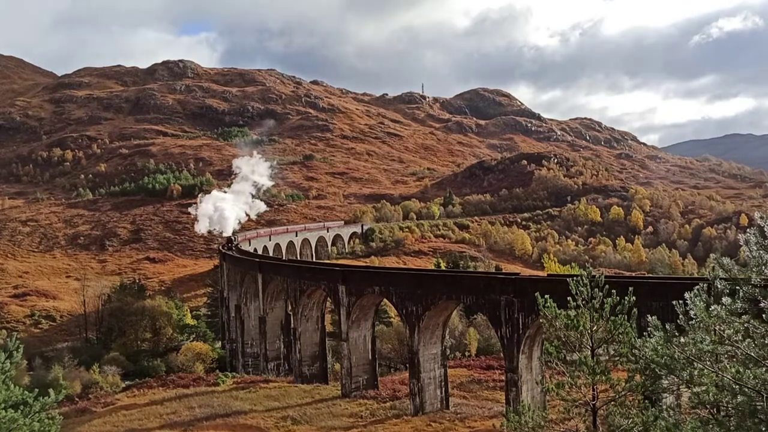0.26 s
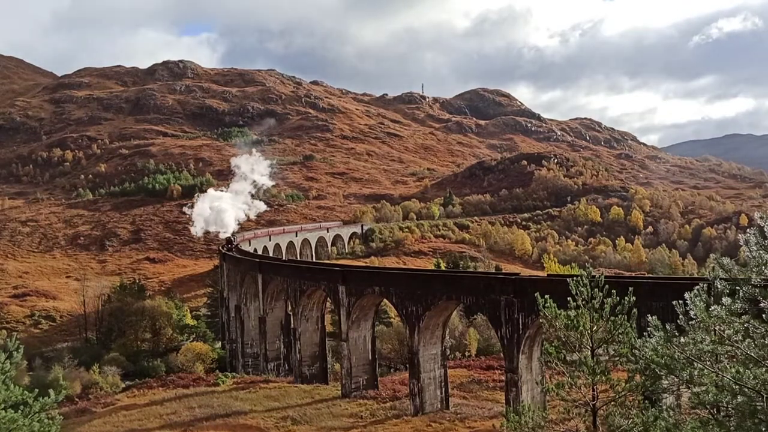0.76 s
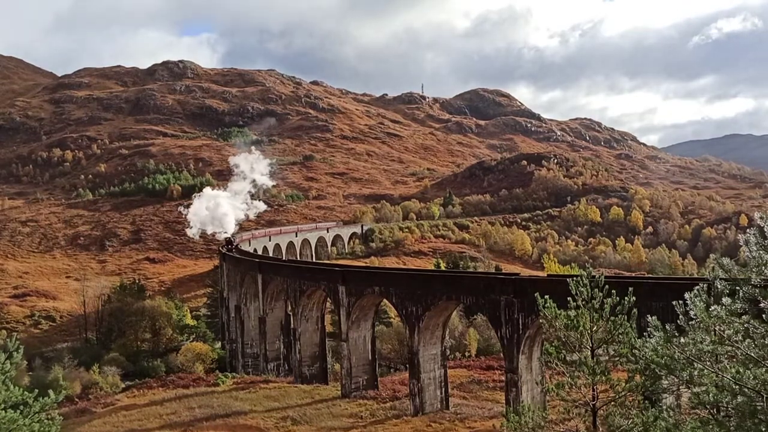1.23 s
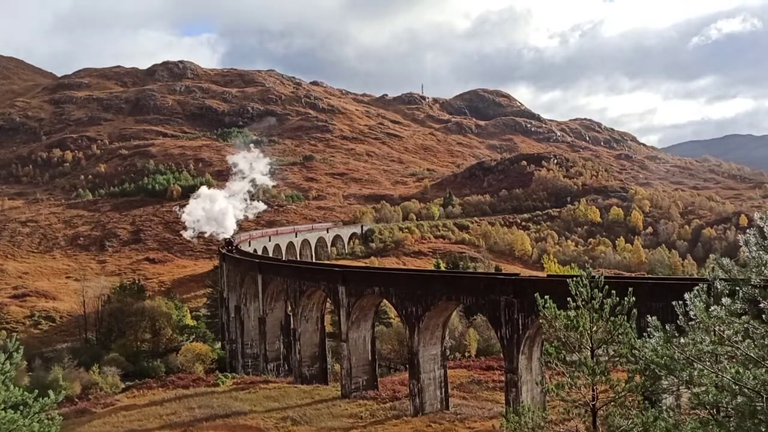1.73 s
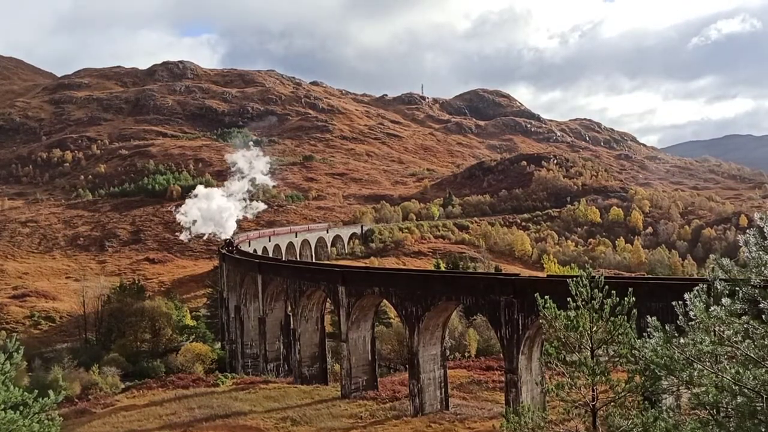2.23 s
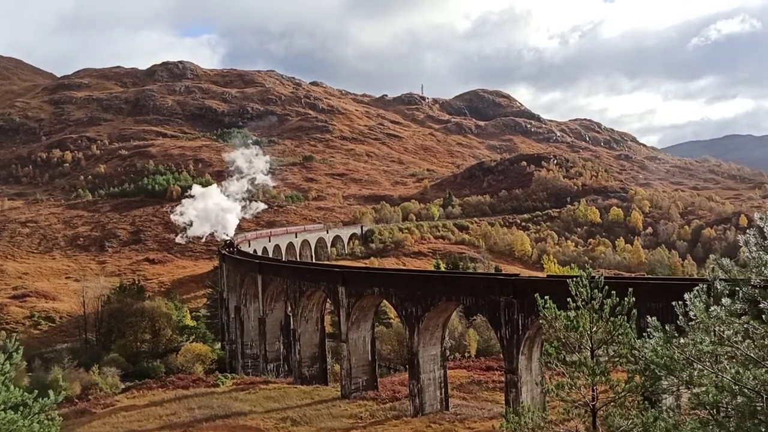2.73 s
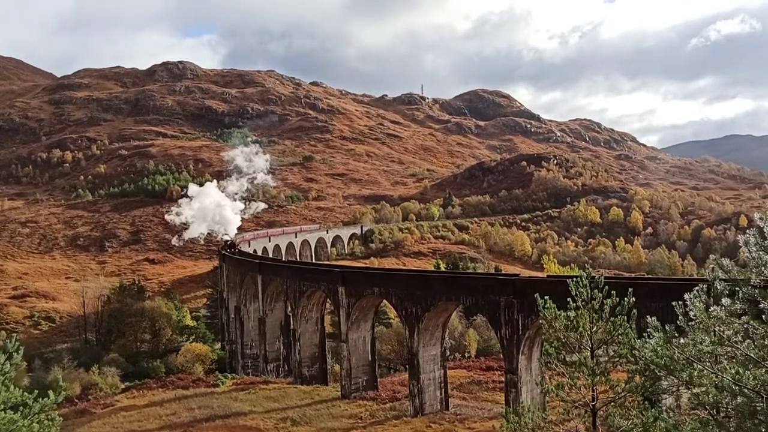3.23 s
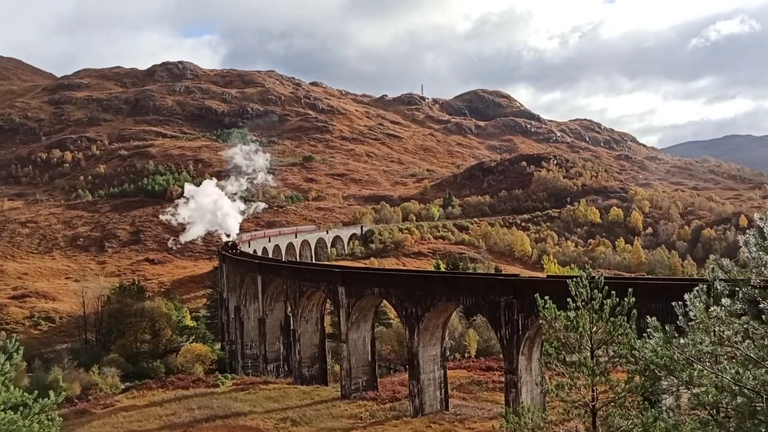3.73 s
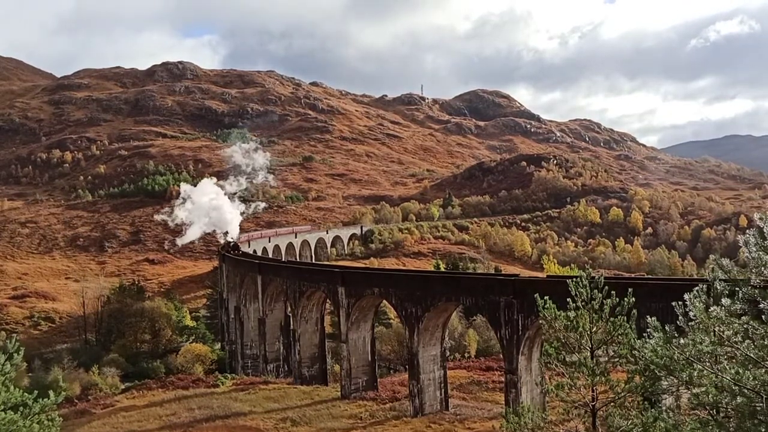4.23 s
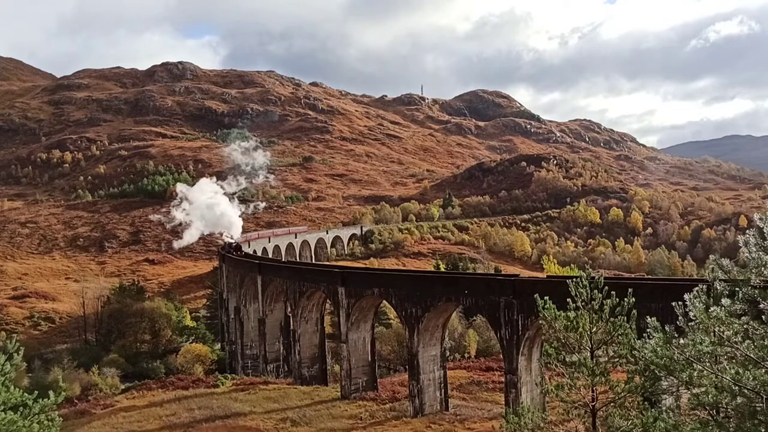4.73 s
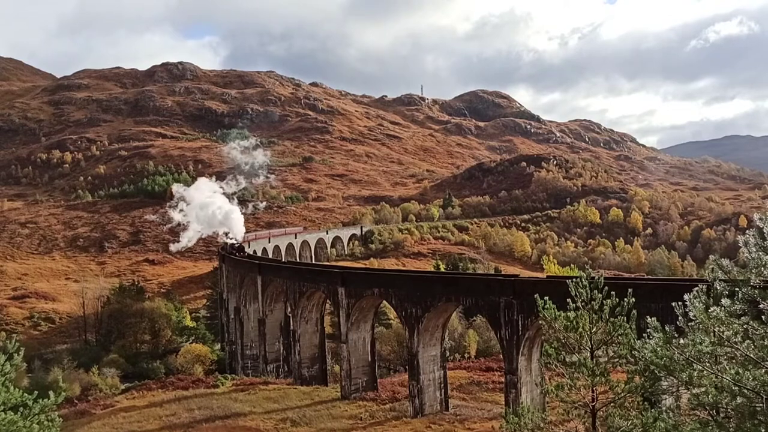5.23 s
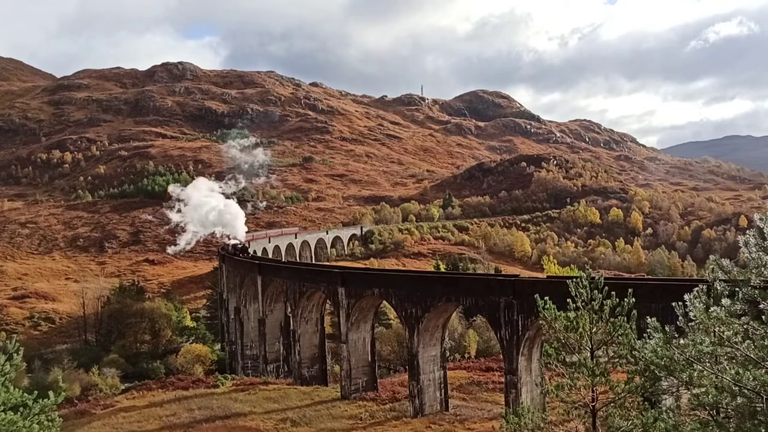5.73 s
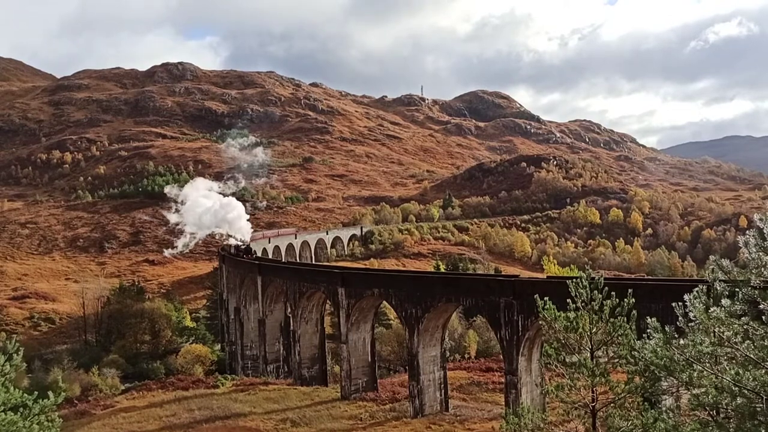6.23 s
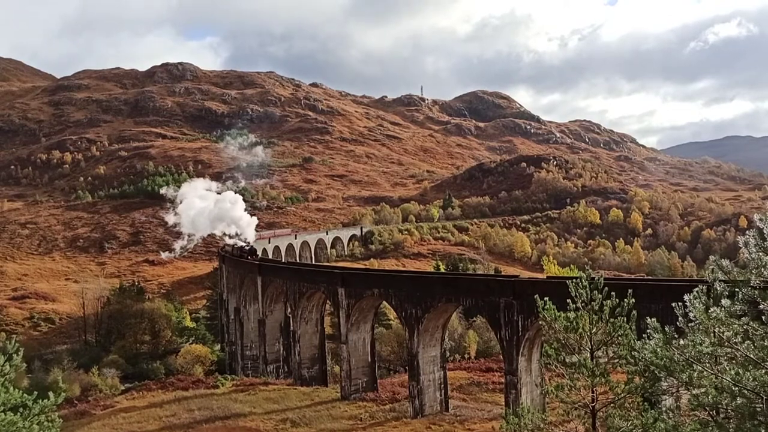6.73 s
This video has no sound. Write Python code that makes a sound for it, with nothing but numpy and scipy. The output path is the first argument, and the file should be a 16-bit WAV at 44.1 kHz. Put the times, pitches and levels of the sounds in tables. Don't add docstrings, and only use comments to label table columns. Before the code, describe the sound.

Outdoors in a wide valley, a steam locomotive crosses a viaduct at some distance, captured in stereo on a handheld phone. From 0 to 7 seconds it chuffs continuously, close to six beats per second and very slightly quickening, with small differences between the four beats of each wheel turn. Each beat is a soft low thump and hollow boom, then a breathy roar and airy hiss, blurred by short echoes and hillside reverberation. At first it is duller, the right side muffled by a hand. At about 1.87 seconds a close dull knock and swelling cloth rub stop abruptly at 2.02; a fainter crackling stroke follows at 2.09 to 2.18, ending in two tiny snaps. The right side then opens up. Chuffs are stronger around 2.4 to 4 seconds, treble wavering, then crisp and hissy after 6. Leaking steam and faint leaves and water rise gently. It ends still chuffing.

```python
import sys
import numpy as np
from scipy import signal
from scipy.fft import rfft, irfft, next_fast_len
from scipy.io import wavfile
from scipy.ndimage import uniform_filter1d, map_coordinates

SR = 44100
rng = np.random.default_rng(int(sys.argv[2]) if len(sys.argv) > 2 else 0)


def natural_amplitude(level_db):
    exponent = np.asarray(level_db, float) / 20
    return 10 ** exponent


def output_pcm(signal):
    pcm = np.clip(np.atleast_2d(signal).T, -1, 1) * 32767
    wavfile.write(sys.argv[1], SR, np.round(pcm).astype(np.int16))


N = 306936

# place_in_turn (0-1), blast_db, thump_db
CYLINDER_ENDS = [
    (0, -0.5, -0.4),
    (0.245, -1.04, 0.35),
    (0.5107, 0.06, 1.3),
    (0.767, 0.03, 1),
]
# time_s, level_db
BLAST_FORCE = [(0, -11), (.17, -16), (.4, -10.5), (.7, -12), (1.2, -10), (1.75, -9), (2.2, -8), (2.4, -5.5),
               (2.7, -9), (3.05, -6.5), (3.5, -8), (3.8, -6), (4.6, -7.5), (5.3, -8), (5.6, -8), (6.05, -9),
               (6.96, -9)]
# time_s, level_db
AIR_CLARITY = [(0, -30), (.2, -22.5), (.7, -28), (1.2, -27), (1.6, -21.5), (2.05, -18), (2.4, -22.5),
               (3.04, -16.5), (3.35, -18), (3.7, -26.5), (4.2, -26), (4.65, -16.5), (5, -25.5),
               (5.3, -20.5), (5.75, -27.5), (6.05, -20.5), (6.3, -13.5), (6.96, -16.5)]
# time_s, level_db
SHEEN = [(0, 0), (1, -7), (2, -9), (3, -5), (4, -2.5), (4.65, 4), (5, -1.5), (6, 0.5), (6.96, 1)]
# pitch_hz, density_db_per_hz
SMOKEBOX = [(40, -40), (86, -10.5), (105, -12.5), (130, -14), (170, 0), (194, 4), (230, 2), (271, -17),
            (340, -35)]
# pitch_hz, density_db_per_hz
CHIMNEY = [(200, -28), (271, -9.5), (353, 1.5), (430, 0), (506, -1), (590, -12), (625, -9), (668, -12),
           (800, -7), (893, -3), (1000, -8.5), (1100, -25.5), (1430, -39.5)]
# pitch_hz, density_db_per_hz
ROAR = [(600, -30.5), (1000, -17), (1160, -5), (1260, -10), (1400, -1.5), (1600, -10), (2100, -14.5),
        (3000, -27.5)]
# pitch_hz, density_db_per_hz
RIM_HISS = [(1200, -23), (2100, -8.5), (2500, 2), (2650, 2), (3250, 2.5), (3500, 0), (4300, 0), (4900, -6),
            (6000, -32)]
# pitch_hz, density_db_per_hz
FIZZ = [(3500, -22), (4800, 1.5), (6400, 4.5), (8000, -0.5), (12000, -13.5)]
# pitch_hz, density_db_per_hz
CYLINDER_LEAK = [(1500, -25.5), (2500, -7), (3800, -4.5), (4300, 3), (4700, -5), (6500, -3), (8000, -3.5)]
# start_delay_ms, end_delay_ms, left_db, right_db
BOUNCES = [
    (1.9, 1.324, -29, -21.5),
    (3.1, 4.2, -31, -39),
    (5.7, 4.91, -17, -20),
    (8.3, 9.8, -22.5, -24),
    (13.1, 11.2, -15.5, -20.5),
]
# pitch_hz, t60_s
BUSH_DECAY = [(100, 0.027), (1000, 0.059), (8000, 0.029)]
# pitch_hz, level_db
BUSH_COLOUR = [(250, -27), (500, -16), (1100, -9), (2200, -7), (4500, -8), (8000, -3)]
# pitch_hz, t60_s
HILL_DECAY = [(100, 0.4), (300, 1.2), (1000, 0.66), (4000, 0.14), (8000, 1.1)]
# pitch_hz, level_db
HAND_SHADE = [(500, -.5), (1500, -2), (2600, -5), (4500, -8), (5200, -15), (7700, -22)]
# start_s, stop_s, rub_db, crackle_db, swell_db
SLEEVE = [
    (1.872, 2.023, -25, -58, 26),
    (2.09, 2.177, -38, -39, 36),
]
# pitch_hz, density_db_per_hz
RUB = [(120, -23), (300, -6.5), (1000, 0.5), (2000, -9), (3400, -14.5), (4500, -18.5), (8000, -28)]
# time_s, pitch_hz, level_db
KNOCK = (1.8745, 150, 0)
# time_s, level_db
SNAPS = [
    (2.172, -34),
    (2.180, -31),
]
# pitch_hz, density_db_per_hz
HILLSIDE_AIR = [(25, -18.5), (60, -10), (120, 0), (400, -6), (1000, -8.5), (2000, -15.5), (4200, -19.5),
                (8000, -19.5), (12000, -34.5)]
# pitch_hz, likeness (0-1)
AIR_LIKENESS = [(60, 1), (250, 0.91), (1000, 0.16), (4000, 0.15)]
# pitch_hz, level_db
TONE_STEPS = [(4650, 1.5), (4850, -4.5), (6000, -7), (6150, 0), (7600, -3), (7750, -10.5), (8350, -20),
              (8600, -68), (11400, -73.5)]
# pitch_hz, level_db
PORT_TILT = [(600, 0), (1500, -1), (2600, 1.5), (4500, 1.5), (8000, 3)]

TURNS = 11


def evened(x):
    return x / np.sqrt(np.mean(x ** 2) + 1e-20)


def read(points, hz):
    f, value = np.transpose(points)
    return np.interp(np.log(hz + 1), np.log(f + 1), value)


def coloured(x, points):
    log_gain = np.log(natural_amplitude(read(points, abs(np.fft.fftfreq(8192, 1 / SR)))))
    taps = np.fft.ifft(np.exp(np.conj(signal.hilbert(log_gain)))).real[:4096]
    return signal.oaconvolve(x, taps / np.linalg.norm(taps))[:len(x)]


def filtered(x, db):
    size = next_fast_len(N)
    gain = natural_amplitude(db(np.fft.rfftfreq(size, 1 / SR)))
    return irfft(rfft(x, size) * gain, size)[..., :N]


def band(x, lo_hz, hi_hz):
    return signal.sosfilt(signal.butter(8, [lo_hz, hi_hz], "band", fs=SR, output="sos"), x)


def delayed(x, samples):
    return map_coordinates(x, [np.arange(N) - samples], order=3)


def nearing(gain_db, bend):
    return natural_amplitude(gain_db * (np.arange(N) / N) ** bend)


def beat_times():
    first_s, turn_s, quicken_s = .0107, .68882, .00389
    turns = (np.arange(TURNS)[:, None] + np.transpose(CYLINDER_ENDS)[0]).ravel()
    return first_s + turn_s * turns - quicken_s * turns ** 2


def blasts(db, late_s, rise_s, open_share, t60_s, flutter_db, size):
    valve_s = 0.057
    t, flow = np.arange(N) / SR, np.zeros(N)
    for s, gain in zip(beat_times(), natural_amplitude(db)):
        u = np.maximum(t - s - late_s, 0)
        opening = 1 - np.exp(-(u / rise_s) ** 2)
        dying = natural_amplitude(-60 * np.maximum(u - open_share * valve_s, 0) / t60_s)
        flow += gain * opening * dying
    eddies = evened(uniform_filter1d(rng.standard_normal(N), size))
    return flow * natural_amplitude(flutter_db * eddies) * rng.standard_normal(N)


def locomotive():
    s = beat_times()
    way = s * SR / N
    end_db, end_thump_db = np.tile(CYLINDER_ENDS, (TURNS, 1)).T[1:]
    chance_db = 1.1 * rng.standard_normal((len(s), 4)).T

    blast_db = np.interp(s, *np.transpose(BLAST_FORCE)) + end_db
    clarity_db = np.interp(s, *np.transpose(AIR_CLARITY))
    thump_db = -19 + 0.34 * blast_db + 3.5 * way + end_thump_db + chance_db[0]
    roar_db = 0.76 * blast_db - 25.5 + 11.5 * way ** 0.28 + .5 * chance_db[1]
    hiss_db = blast_db + clarity_db + .5 * chance_db[2]
    fizz_db = blast_db + 0.63 * clarity_db + np.interp(s, *np.transpose(SHEEN)) + chance_db[3]

    thump = blasts(thump_db, -0.014, 0.0093, 0.88, 0.31, flutter_db=0.97, size=400)
    boom = blasts(blast_db, -0.014, 0.02, 0.96, 0.19, flutter_db=1.14, size=300)
    roar = blasts(roar_db, -0.011, 0.019, 0.99, 0.17, flutter_db=2.2, size=200)
    hiss = blasts(hiss_db, -0.0011, 0.011, 0.79, 0.18, flutter_db=1.9, size=120)
    fizz = blasts(fizz_db, -0.0076, 0.024, 1.0, 0.067, flutter_db=1.7, size=120)

    low = natural_amplitude(-3.0) * coloured(thump, SMOKEBOX) + natural_amplitude(-8.5) * coloured(boom, CHIMNEY)
    high = natural_amplitude(-2.0) * coloured(hiss, RIM_HISS) + natural_amplitude(-9.5) * coloured(fizz, FIZZ)
    return low + natural_amplitude(-4.0) * coloured(roar, ROAR) + high


def leak():
    waver = natural_amplitude(2.6 * evened(uniform_filter1d(rng.standard_normal(N), 3000)))
    return natural_amplitude(-58) * nearing(23.5, 1.4) * waver * coloured(rng.standard_normal(N), CYLINDER_LEAK)


def bounces(x):
    way = np.arange(N) / N
    echoes = np.zeros((2, N))
    for start_ms, end_ms, left_db, right_db in BOUNCES:
        delay_ms = start_ms + (end_ms - start_ms) * way
        echoes += natural_amplitude([[left_db], [right_db]]) * delayed(x, delay_ms * SR / 1000)
    return echoes


def scattered(x, decays, gap):
    taps = np.zeros((2, SR))
    taps[:, gap::20] = rng.choice([-1., 1.], taps[:, gap::20].shape)
    places = np.argsort(np.arange(SR) // 20 + rng.random((2, SR)), 1)
    taps = np.take_along_axis(taps, places, 1)
    hz, t, z = signal.stft(taps, SR, nperseg=128)
    tail = signal.istft(z * natural_amplitude(-60 * t / read(decays, hz)[:, None]), SR, nperseg=128)[1]
    return signal.fftconvolve(x[None], tail / np.linalg.norm(tail[0]), axes=1)[:, :N]


def bushes(x):
    leafy = natural_amplitude(3.5 * hand()) * filtered(x, lambda hz: read(BUSH_COLOUR, hz))
    turn = 2 * np.pi * .83 * np.arange(N) / SR
    echoes = np.zeros((2, N))
    for k in range(3):
        share = np.sqrt(2 / 3) * np.cos(turn + k * np.pi / 3)
        echoes += scattered(leafy * share, BUSH_DECAY, gap=40)
    return echoes


def hillsides(x):
    slopes = natural_amplitude(-17) * scattered(x, HILL_DECAY, gap=400)
    slopes[1] = .85 * slopes[0] + .5 * slopes[1]
    return slopes


def hand():
    t, bared = np.arange(N) / SR, np.zeros(N)
    for start_s, stop_s, *_ in SLEEVE:
        bared += .5 * np.clip((t - start_s) / (stop_s - start_s), 0, 1) ** 2
    return 1 - bared


def strokes(column, bend):
    t, gain = np.arange(N) / SR, np.zeros(N)
    for stroke in SLEEVE:
        start_s, stop_s, swell_db = stroke[0], stroke[1], stroke[4]
        to_go = np.clip((stop_s - t) / (stop_s - start_s), 0, 1)
        stop_db = 4500 * np.clip(t - stop_s, 0, .1)
        gain += (t > start_s) * natural_amplitude(stroke[column] - swell_db * to_go ** bend - stop_db)
    return gain


def sleeve():
    t = np.arange(N) / SR
    lumps = natural_amplitude(1.5 * evened(uniform_filter1d(rng.standard_normal(N), 400)))
    push = evened(band(rng.standard_normal((2, N)) * lumps, 80, 400))
    rub = np.array([coloured(v, RUB) for v in rng.standard_normal((2, N))])
    knock_s, knock_hz, knock_db = KNOCK
    u = np.maximum(t - knock_s, 0)
    jolt = natural_amplitude(-18.5 - 55 * u) * np.minimum(u / .03, 1) * (t < SLEEVE[0][1])
    near = strokes(column=2, bend=2.7) * (natural_amplitude(-5) * push + rub) + jolt * push
    near += natural_amplitude(knock_db - 3200 * u) * (1 - np.exp(-u / .003)) * np.sin(2 * np.pi * knock_hz * u)
    for s, db in SNAPS:
        near += natural_amplitude(db - 25000 * abs(t - s)) * rng.standard_normal(N)
    return near * natural_amplitude([[-13], [5]])


def air():
    frames, hz = N // 256 + 5, np.fft.rfftfreq(1024, 1 / SR)
    a, b, c, d, patches = rng.standard_normal((frames, 513, 5)).T
    patches = evened(uniform_filter1d(uniform_filter1d(patches, 12, 0), 14, 1))
    same = np.clip(read(AIR_LIKENESS, hz), -1, 1)[:, None]
    left = a + 1j * b
    right = same * left + np.sqrt(1 - same ** 2) * (c + 1j * d)
    z = np.array([left, right]) * natural_amplitude(read(HILLSIDE_AIR, hz)[:, None] + 2.0 * patches)
    bed = evened(signal.istft(z, nperseg=1024, noverlap=768)[1][:, :N])
    return natural_amplitude(-41) * nearing(6.5, 2.14) * bed


def top_band(heard):
    fibres = .5 + uniform_filter1d(30. * (rng.random(N) < 200 / SR), 40)
    crackle = strokes(column=3, bend=1.0) * evened(rng.standard_normal((2, N)) * fibres)
    treble = np.sqrt(abs(uniform_filter1d(band(heard[0], 6200, 7600) ** 2, 400)))
    steam = natural_amplitude(-46) * nearing(14, bend=3) * treble
    hiss = np.hypot(natural_amplitude(-70.5), steam) * rng.standard_normal((2, N))
    return band(band(crackle + hiss, 9900, 15700), 11500, 16000) * natural_amplitude([[-2.5], [2.5]])


def scene():
    t = np.arange(N) / SR
    train = locomotive() + leak()
    direct = train + bounces(train)
    swing = np.clip((3.8 - t) / 1.6, 0, 1)
    lag_samples = 4 + 1.9 * hand() + 1.5 * swing
    direct[1] = delayed(direct[1], lag_samples)
    field = direct + bushes(train) + hillsides(train) + air()
    field[1] += hand() * (filtered(field[1], lambda hz: read(HAND_SHADE, hz)) - field[1])
    return field + sleeve()


def roll_off(x):
    return signal.sosfilt(signal.butter(12, 15750, fs=SR, output="sos"), x)


def record(dry):
    limited = 0.73 * np.tanh(dry / 0.67)
    heard = filtered(limited, lambda hz: read(TONE_STEPS, hz) + np.outer([.5, -.5], read(PORT_TILT, hz)))
    rumble_cut = signal.butter(4, 55, "high", fs=SR, output="sos")
    mix = signal.sosfilt(rumble_cut, heard) + top_band(heard)
    return roll_off(mix)


dry = scene()
out = record(dry)
output_pcm(out)
```